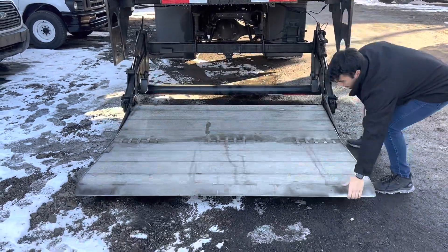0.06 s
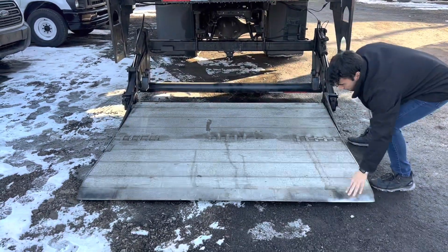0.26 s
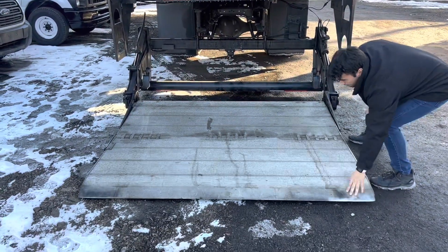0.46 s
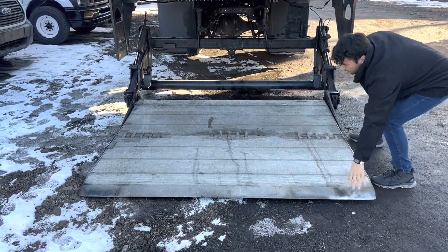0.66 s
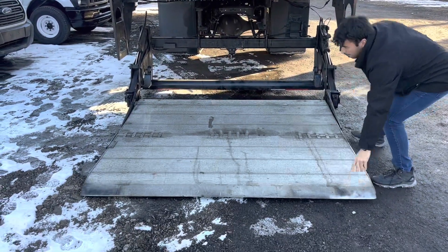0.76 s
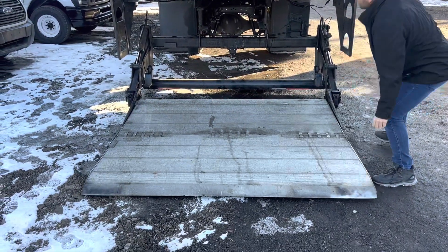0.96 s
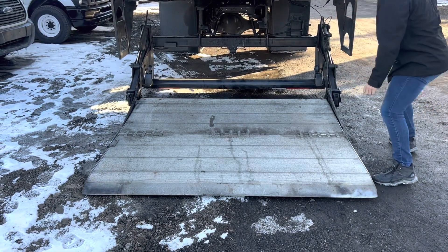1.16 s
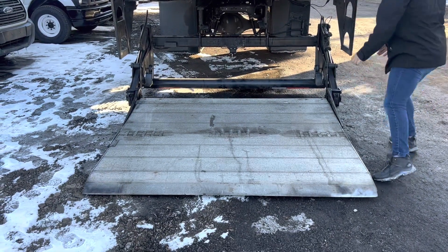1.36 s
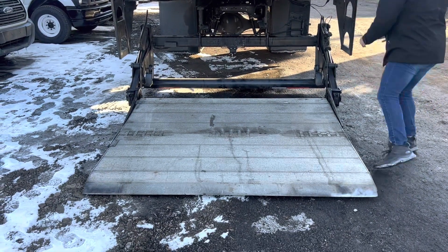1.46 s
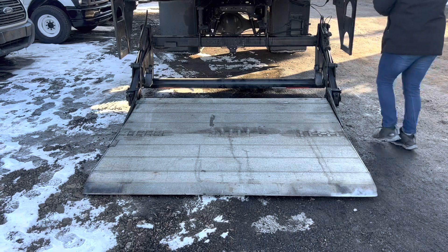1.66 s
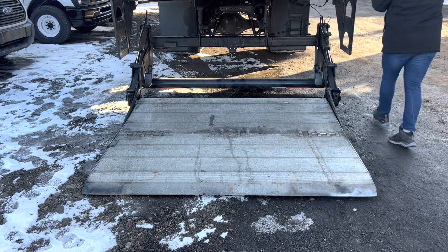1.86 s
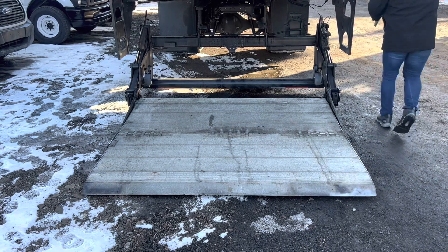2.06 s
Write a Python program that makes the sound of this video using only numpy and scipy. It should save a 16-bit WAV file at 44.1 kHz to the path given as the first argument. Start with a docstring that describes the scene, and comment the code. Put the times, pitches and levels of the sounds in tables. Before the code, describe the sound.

A metal truck liftgate slams onto asphalt, then footsteps scuff away over an idling diesel engine.

```python
"""A diesel engine idles in an open yard, and a shoe scuffs on gritty asphalt. A hinge creaks as a
truck's metal liftgate platform is let down. From about 0.17 s its edge touches, slams and settles:
each blow rings the metal and crushes grit. The truck body booms under the load, a small stone snaps,
and dull echoes fade. Then shoes scuff away, heels knocking near 1.4 s and 1.9 s, as the engine runs on."""
import sys
import numpy as np
from scipy import signal
from scipy.io import wavfile

SR = 44100
rng = np.random.default_rng(int(sys.argv[2]) if len(sys.argv) > 2 else 0)


def wav_record(signal):
    """Record a signal, one row per channel, as 16-bit PCM in the file named by sys.argv[1]."""
    frames = np.transpose(np.atleast_2d(signal))
    bounded = np.clip(frames, -1, 1)
    # unit amplitude maps onto the largest positive 16-bit level
    quanta = np.round(bounded * 32767).astype(np.int16)
    wavfile.write(sys.argv[1], SR, quanta)


N = 92610
T = np.arange(N) / SR
BANDS = 25 * 2 ** (np.arange(29) / 3)   # pitches a third of an octave apart [Hz]

# The platform hits the ground: (time [s], strength [dB], brightness [Hz], crushed grit level [dB])
BLOWS = [(0.166, -10, 3020, -40.5), (0.175, -4.5, 330, -60), (0.1962, -11, 6000, -25.5),
         (0.1987, 0, 2710, -38), (0.2115, 2.5, 432, -52), (0.224, 1.5, 803, -53.5),
         (0.2430, -21, 2400, -58), (0.314, -6, 637, -58), (0.368, -4, 219, -64.5)]
def platform(width_db=-4.5, ring_db=2.5, pan_db=-1.5):
    """Each blow rings the metal and crushes grit, which is muffled under the platform."""
    metal = metal_tones() + from_db(ring_db) * metal_ring(width_db)
    crushing = sum(from_db(db) * swell(time, rise=0.0051, fall=0.0075) for time, _, _, db in BLOWS)
    crunch = lowpass(grit(width_db), hz=11160) * crushing
    return (metal + crunch) * from_db([[pan_db / 2], [-pan_db / 2]])


def shaking(hz, fade, rise_cycles=1.2):
    """How hard the platform shakes at one pitch: each blow adds energy, and low pitches build up last."""
    power = np.zeros(N)
    one_blow = struck(0, rise_cycles / hz, fade) ** 2
    for time, strength_db, bright_hz, _ in BLOWS:
        start = int(time * SR)
        power[start:] += (from_db(strength_db) * treble_loss(hz, bright_hz)) ** 2 * one_blow[:N - start]
    return np.sqrt(power)


# The platform's own notes: (pitch [Hz], level per blow [dB], time to fade by 60 dB [s])
METAL_TONES = [(164.5, -20.5, 0.34), (202, -28.5, 1), (235.8, -14.5, 0.21), (283, -14, 0.31),
               (326, -22.5, 0.26), (368.5, -27, 0.18), (409.8, -24, .23), (566.6, -23.5, .2),
               (602, -26.5, 0.26), (632, -25.5, 0.15), (711, -29.5, 0.35), (826, -27.5, 0.19),
               (1313.5, -43, 0.073), (1494, -24, 0.14), (1510, -22, 0.18), (1937, -28, 0.27),
               (2104, -24.5, 0.14), (2320, -18, 0.063)]
def metal_tones():
    """Struck metal rings at its own pitches, each dying away at its own pace."""
    return sum(from_db(db) * shaking(hz, fade) * np.sin(2 * np.pi * (hz * T + rng.random()))
               for hz, db, fade in METAL_TONES)


# The ringing between those notes: (pitch [Hz], relative band level [dB], time to fade by 60 dB [s])
METAL_RING = [(69.5, -47, 0.078), (130, -27.5, 0.39), (242, -22, 0.2), (426, -28, 0.24), (687, -30, 0.21),
              (990, -32, 0.25), (1460, -25.5, 0.15), (2037, -26.5, 0.18), (2870, -35.5, 0.23),
              (4950, -31, 0.15), (8400, -39, 0.36), (12000, -45, .11)]
def metal_ring(width_db):
    """Tightly packed ringing blurs into bands of noise."""
    ring = 0
    for hz in BANDS[BANDS > METAL_RING[0][0]]:
        level = from_db(at_hz(METAL_RING, hz)) * shaking(hz, fade=at_hz(METAL_RING, hz, column=2))
        ring += level * band(rng.standard_normal((2, N)), hz, width_db)
    return ring


# The truck body's deep notes: (pitch [Hz], relative level [dB])
BODY_TONES = [(54.73, 1.5), (40.5, -13)]
def truck_body(start=0.25, rise=0.012, hold=0.22, fade=0.35, level_db=-26):
    """The jolt travels up the lift arms, and the truck booms while the load settles."""
    age = np.maximum(T - start, 0)
    level = (1 - np.exp(-age / rise)) * from_db(level_db - 60 * np.maximum(age - hold, 0) / fade)
    return level * sum(from_db(db) * np.sin(2 * np.pi * hz * age) for hz, db in BODY_TONES)


# Where the hinge rings: (pitch [Hz], relative level [dB])
HINGE_TONES = [(950, -5.5), (1480, 4), (2300, -10), (4500, -10.5)]
def hinge(slips_per_s=2500):
    """The hinge gives just before the landing: quick, uneven slips make it ring."""
    slips = (rng.random(N) < slips_per_s / SR) * rng.uniform(0.17, 1, N) + 1e-18
    creak = sum(from_db(db) * resonate(slips, hz, sharpness=4) for hz, db in HINGE_TONES)
    return from_db(-36.5) * rms_one(creak) * swell(0.142, rise=0.02, fall=0.012)


def stone_snap():
    """One small stone breaks under the load with a tiny, bright crack."""
    return from_db(-49.5) * struck(0.383, rise=0.0005, fade=0.032) * ringing_noise(13200, width_hz=5900)


# Scuffs of the soles: (time [s], level [dB], rise [s], fall [s], muffled above [Hz])
SCUFFS = [(0.016, -44.5, 0.02, .025, 12000), (0.343, -41.5, 0.011, .015, 5500),
          (0.449, -44, 0.044, .035, 5000), (0.894, -45.5, 0.024, .018, 12000),
          (1.06, -55, .012, .04, 12000), (1.42, -43, 0.0062, .005, 15000),
          (1.439, -35.5, 0.0057, .006, 14000), (1.454, -39.5, 0.0041, .012, 14000),
          (1.70, -53, 0.085, .08, 14000), (1.813, -41, 0.0059, .005, 5000),
          (1.909, -38.5, 0.0058, .004, 15000), (1.92, -42, 0.0055, .016, 14000),
          (1.966, -42, 0.011, .012, 12000), (1.989, -38, 0.0047, .007, 12000)]
def soles():
    """Soles press and drag over the grit in short crunches."""
    crunch = grit(width_db=0)
    return sum(from_db(db) * lowpass(crunch * swell(time, rise, fall), hz)
               for time, db, rise, fall, hz in SCUFFS)


# Heel landings: (time [s], level [dB])
HEELS = [(1.439, -37.5), (1.908, -38.5), (1.988, -48)]
def heels():
    """Each heel lands with a dull knock, and stones clack under it."""
    knock = rms_one(lowpass(rng.standard_normal(N), hz=1190))
    clack = from_db(-5) * ringing_noise(2160, width_hz=170)
    return (knock + clack) * sum(from_db(db) * struck(time, rise=0.0011, fade=0.033) for time, db in HEELS)


# The tone of crunching grit, with a dip near 10.5 kHz that is not the grit's:
# (pitch [Hz], relative level per hertz [dB])
GRIT_TONE = [(500, -2), (1500, 2.5), (2400, 0.5), (3200, -3.5), (6000, -2), (8600, 0), (10500, -19.5),
             (12500, -7), (15500, 3)]
def grit(width_db, clicks_per_s=4000, spread_db=3.4):
    """Small stones make a steady crunch of dense clicks, uneven in size."""
    shape = (2, 2, N)   # two pairs of click streams; neighbouring bands take turns
    sizes = from_db(spread_db * np.minimum(rng.exponential(1, shape), 4)) * rng.choice([-1, 1], shape)
    clicks = sizes * (rng.random(shape) < clicks_per_s / SR)
    return rms_one(sum(from_db(at_hz(GRIT_TONE, hz)) * np.sqrt(hz) * band(clicks[k % 2], hz, width_db)
                       for k, hz in enumerate(BANDS) if hz > GRIT_TONE[0][0]))


def engine(firing_hz=37.56, speed_waver=0.0028):
    """An idling diesel drones, and its noise throbs with strong and weak firings."""
    phase = 2 * np.pi * np.cumsum(firing_hz * (1 + speed_waver * drift(1.22))) / SR
    throb = rms_one(1 + 0.1 * np.cos(phase / 2) + 0.058 * np.cos(phase) + 0.082 * np.cos(2 * phase))
    return engine_drone(phase) + engine_rumble(throb) + engine_block(throb)


# The engine's notes: (pitch [times the firing rate], level [dB])
DRONE_TONES = [(1, -52.5), (2, -36), (2.5, -46), (3, -32), (4, -43.5), (4.5, -42), (5, -38), (6.5, -56),
               (8.5, -52)]
def engine_drone(phase, hum_hz=53.6, hum_db=-39):
    """Tones follow the firings, with a deep hum beside them; each wavers by about 1 dB."""
    drone = sum(from_db(db + drift(1.7)) * np.sin(multiple * phase + rng.uniform(0, 2 * np.pi))
                for multiple, db in DRONE_TONES)
    hum = from_db(hum_db + drift(9)) * np.sin(2 * np.pi * (hum_hz * T + rng.random()))
    return np.sqrt(2) * (drone + hum)


# The engine's rumble and hiss, with an empty gap near 10.5 kHz that is not the engine's:
# (pitch [Hz], band level [dB])
RUMBLE = [(25, -75.5), (45, -61), (90, -41.5), (150, -41), (220, -40.5), (310, -44), (420, -55), (600, -56),
          (820, -55), (1150, -55.5), (1600, -61), (2250, -62), (3000, -66.5), (4400, -64.5), (6000, -71),
          (8600, -69), (10500, -103), (15000, -73)]
def engine_rumble(throb):
    """Bands of noise flicker by about 1 dB; the low ones throb with the firings."""
    rumble = 0
    for hz in BANDS:
        level = from_db(at_hz(RUMBLE, hz) + drift(17))
        pulse = 1 + (throb - 1) * treble_loss(hz, bright_hz=1000)
        rumble += level * pulse * band(rng.standard_normal((2, N)), hz, width_db=-0.5)
    return rumble


# Where the engine block rings: (pitch [Hz], width [Hz], level [dB])
BLOCK_TONES = [(310.8, 69, -44), (1044, 185, -55), (1196, 87, -57), (2213, 61, -64.5)]
def engine_block(throb):
    """The block rings under the engine's knocking."""
    return throb * sum(from_db(db) * ringing_noise(hz, width) for hz, width, db in BLOCK_TONES)


def yard_echo(sound, level_db=-24):
    """Dull, scattered echoes come back from the parked trucks."""
    tail = lowpass(rng.standard_normal((2, N)), hz=4530) * struck(0.022, rise=0.046, fade=1.0)
    return from_db(level_db) * signal.fftconvolve(sound, rms_one(tail) / np.sqrt(N), axes=1)[:, :N]


# How wide noise sounds: (pitch [Hz], left-right difference against the shared part [dB])
STEREO_WIDTH = [(50, -28.5), (110, -15.5), (250, -10.5), (600, -4.5), (1400, -2.5), (3000, -1.5),
                (6000, -6.5), (12000, 2)]
def band(pair, hz, width_db):
    """A third of an octave of two unrelated signals, as stereo that widens toward the treble."""
    sos = signal.butter(2, [hz * 2 ** (-1 / 6), hz * 2 ** (1 / 6)], "band", fs=SR, output="sos")
    padded = np.hstack([pair[:, -SR // 10:], pair])   # a lead-in lets the filter settle
    shared, difference = rms_one(signal.sosfilt(sos, padded)[:, -N:])
    return shared + from_db(at_hz(STEREO_WIDTH, hz) + width_db) * difference * [[1], [-1]]


def swell(time, rise, fall):
    """A level that climbs to a peak at the given time, then falls; all in seconds."""
    return np.exp(-np.maximum((time - T) / rise, (T - time) / fall))


def struck(time, rise, fade):
    """The level after a hit: it builds up, then drops 60 dB every `fade` seconds."""
    age = np.maximum(T - time, 0)
    return (1 - np.exp(-age / rise)) * from_db(-60 * age / fade)


def treble_loss(hz, bright_hz):
    """The share of a blow that reaches a pitch: soft blows lack treble."""
    return 1 / np.sqrt(1 + (hz / bright_hz) ** 4)


def resonate(x, hz, sharpness):
    """Pass a sound twice through a filter that rings at one pitch; average level 1."""
    b, a = signal.iirpeak(hz, sharpness, fs=SR)
    return rms_one(signal.lfilter(b, a, signal.lfilter(b, a, x)))


def ringing_noise(hz, width_hz):
    """Noise gathered around one pitch."""
    return resonate(rng.standard_normal(N), hz, hz / width_hz)


def drift(rate_hz):
    """A slow random wander, about 1 in size."""
    r = np.exp(-80 * np.pi * rate_hz / SR)
    slow = signal.lfilter([1], [1, -2 * r, r * r], rng.standard_normal(N // 40 + 2002))[2000:]
    return np.interp(np.arange(N) / 40, np.arange(len(slow)), rms_one(slow))


def lowpass(x, hz, order=2):
    """Muffle everything above a pitch."""
    return signal.sosfilt(signal.butter(order, min(hz, 0.45 * SR), fs=SR, output="sos"), x + 1e-18)


def at_hz(rows, hz, column=1):
    """Read a table at any pitch, blending between its rows."""
    table = np.array(rows)
    return np.interp(np.log(hz), np.log(table[:, 0]), table[:, column])


def from_db(db):
    """Turn decibels into a multiplier."""
    return 10 ** (np.asarray(db) / 20)


def rms_one(x):
    """Scale to an average level (rms) of 1."""
    return x / np.sqrt(np.mean(x ** 2) + 1e-20)


def scene():
    """The slam and its echo, the truck's boom, the steps and the engine."""
    slam = platform() + hinge() + stone_snap()
    return slam + yard_echo(slam) + truck_body() + soles() + heels() + engine()


def record(dry, treble_hz=9020, treble_db=-11, cutoff_hz=15800):
    """The highest peaks are rounded, the treble above about 9 kHz is dulled, and the very top is cut."""
    rounded = 1.3 * np.tanh(dry / 1.3)
    top = signal.sosfilt(signal.butter(10, treble_hz, "high", fs=SR, output="sos"), rounded)
    dulled = lowpass(rounded, treble_hz, order=10) - from_db(treble_db) * top
    return signal.sosfilt(signal.ellip(10, 0.1, 80, cutoff_hz, fs=SR, output="sos"), dulled)


dry = scene()
out = record(dry)
wav_record(out)
```